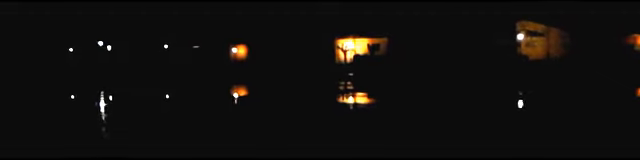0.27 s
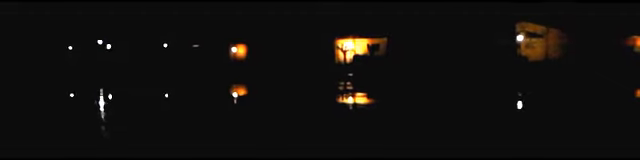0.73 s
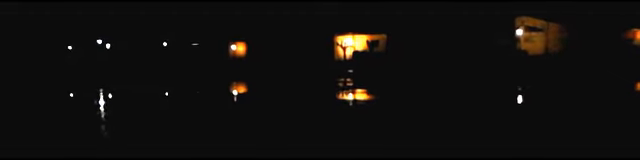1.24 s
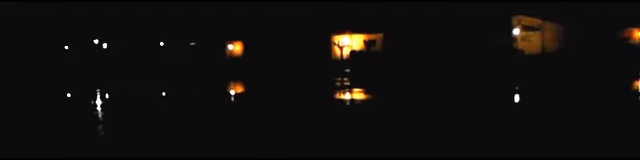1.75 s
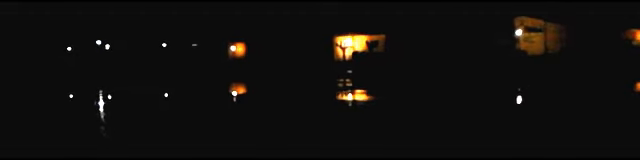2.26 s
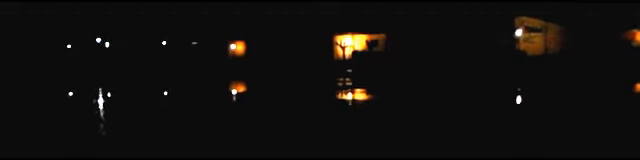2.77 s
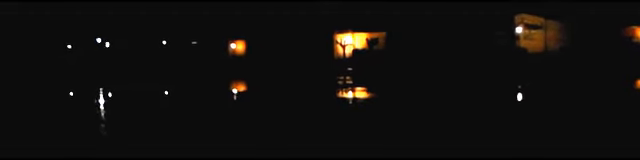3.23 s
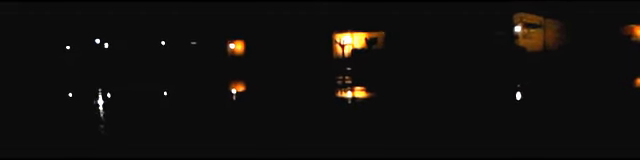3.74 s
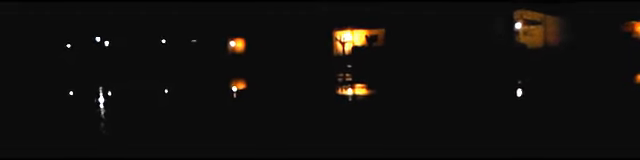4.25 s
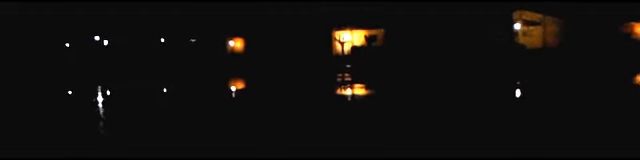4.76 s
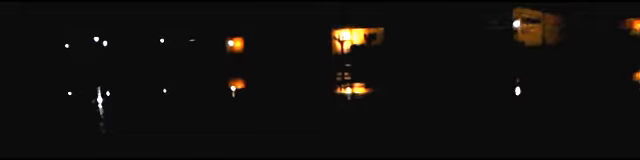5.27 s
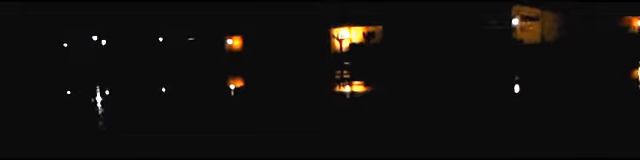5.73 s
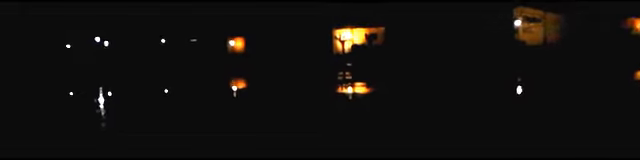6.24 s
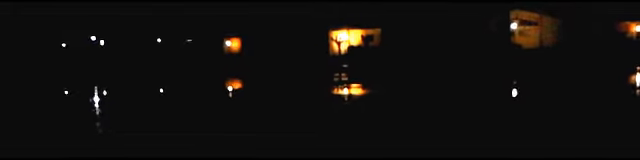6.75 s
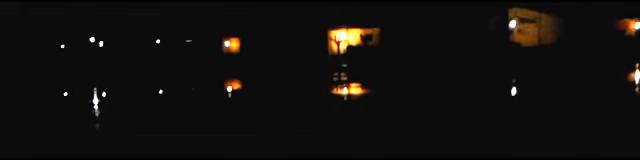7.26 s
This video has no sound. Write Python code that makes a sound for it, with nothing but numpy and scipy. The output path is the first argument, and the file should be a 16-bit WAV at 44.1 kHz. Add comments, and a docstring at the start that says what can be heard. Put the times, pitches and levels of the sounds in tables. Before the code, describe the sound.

Dense chorus of frogs croaking in rapid overlapping rattling trills beside still water at night, with low wind rumble and two soft microphone bumps.

```python
"""Night frog chorus beside still water

Near frogs croak in trains of about 95 pulses a second; each pulse rings the vocal sac (rising as it swells),
the throat, its overtones and some faint treble. Distant frogs merge into a buzzing bed, and thin pulsed
squeaks glide through the treble. Water and banks return short echoes, and hiss swells with the chorus.
Wind rumbles on the microphone, which is bumped twice; faint fluttering tones hoot far off."""
import sys
import numpy as np
from scipy import signal
from scipy.fft import rfft, irfft
from scipy.io import wavfile

SR = 44100
rng = np.random.default_rng(int(sys.argv[2]) if len(sys.argv) > 2 else 0)


def wrap_up_sound(samples):
    """Save the sound to the file named by the first command line argument, as 16-bit audio."""
    columns = np.atleast_2d(samples).T
    # keep every value between -1 and 1, then stretch to whole-number steps
    tamed = np.clip(columns, -1, 1)
    steps = np.round(tamed * 32767).astype(np.int16)
    wavfile.write(sys.argv[1], SR, steps)


def magnitude_from_level(level_db):
    """Linear magnitude for a level in decibels (20 dB per decade)."""
    exponent = np.asarray(level_db, float) / 20
    return 10 ** exponent


N = 330750  # 7.5 s

# distant chorus, levels before each use trims them: (time [s], sac level [dB], throat level [dB])
FAR_CHORUS = [(0.0, -33.5, -35), (0.4, -31, -40.5), (0.62, -33, -38), (0.83, -81, -90), (0.9, -30, -51),
              (0.98, -22, -35.5), (1.21, -26.5, -31), (1.71, -35, -48), (2.02, -27.5, -32),
              (2.36, -38, -37), (2.5, -25, -30.5), (2.8, -25.5, -40.5), (2.94, -52, -52),
              (3.11, -20.5, -37), (3.36, -32, -52), (3.51, -31.5, -28), (3.74, -26.5, -33.5),
              (3.84, -39, -53), (4.05, -38, -32.5), (4.53, -22.5, -36.5), (4.74, -43.5, -51.5),
              (5.26, -26, -27.5), (5.51, -37.5, -47), (6.25, -26.5, -42), (6.52, -38.5, -40.5),
              (7.19, -34, -44.5), (7.5, -21.5, -22)]


def curve(rows, x):
    """Interpolates every column of a table over its first column."""
    points, *columns = np.transpose(rows)
    return [np.interp(x, points, column) for column in columns]


def butter(x, hz, kind, order=2):
    """Butterworth filter."""
    return signal.sosfilt(signal.butter(order, hz, kind, fs=SR, output="sos"), x)


def coloured(points):
    """Noise of rms 1 with the given spectrum, interpolated over log frequency."""
    hz = np.fft.rfftfreq(N, 1 / SR)
    points_hz, points_db = np.array(points).T
    shape_db = np.interp(np.log(hz + 1), np.log(points_hz), points_db, -120, -120)
    noise = irfft(rfft(rng.standard_normal(N)) * magnitude_from_level(shape_db), N)
    return noise / noise.std()


def loudness_db(x, lag_s=0.015):
    """Smoothed power in dB against its mean."""
    share = 1 / (lag_s * SR)
    power = signal.lfilter([share], [1, share - 1], x ** 2)
    return 10 * np.log10(np.abs(power) / power.mean() + 1e-6)


def add(out, s, hz, ring_ms, db):
    """Adds one short ring per pulse, swelling and dying almost evenly, with envelope peak db."""
    t = np.arange(int(ring_ms * SR * .009) + 8) / SR
    start = np.ceil(s * SR).astype(int)
    age = t + (start / SR - s)[:, None]  # exact pulse times, finer than a sample
    k = age * 1900 / ring_ms  # the envelope peaks at k = 5, about 2.6 ring times after the pulse
    envelope = magnitude_from_level(db)[:, None] * (k / 5) ** 5 * np.exp(5 - k)
    rings = envelope * np.sin(2 * np.pi * hz[:, None] * age)
    places = start[:, None] + np.arange(len(t))
    out += np.bincount(places.ravel(), rings.ravel(), 2 * N)[:N]


def swell(u, rise, fall):
    """Level in dB along a call, u from 0 to 1: linear rise and fall in amplitude."""
    return 20 * np.log10(np.clip(np.minimum(u / rise, (1 - u) / fall), 1e-3, 1))


def wind(s):
    """Wind on the microphone: low rumbling noise that comes in lumps several times a second."""
    # slow course of the wind, before the lift below: (time [s], level [dB])
    gusts = [(0.0, -58), (0.5, -53.5), (0.75, -64.5), (1.23, -56.5), (1.73, -61.5), (1.98, -54.5),
             (2.17, -59.5), (4.26, -54.5), (4.72, -61.5), (6.27, -54), (6.5, -62), (7.04, -49.5),
             (7.5, -55)]
    # colour of the rumble: (frequency [Hz], relative density [dB per Hz])
    rumble = [(18, -49.5), (28, -29.5), (45, 3.5), (62, -8.5), (80, 0.5), (100, -16.5), (140, -16.5),
              (220, -23), (300, -24)]
    lift_db = 3.5
    lumps_db = 3.5 * np.interp(s, np.arange(100) / 11, rng.standard_normal(100))
    return magnitude_from_level(curve(gusts, s)[0] + lift_db + lumps_db) * coloured(rumble)


def bumps():
    """Knocks on the microphone housing: a quick snap whose pitch drops into a short low thud."""
    # (time [s], level before a 1.5 dB trim [dB])
    knocks = [(4.254, -20.5), (5.623, -24)]
    out, t = np.zeros(N), np.arange(4000) / SR
    turns = np.cumsum(85 + 700 * np.exp(-t / 0.0027)) / SR
    thud = np.sin(2 * np.pi * turns) * np.exp(-t / 0.021)
    for s, db in knocks:
        i = int(s * SR)
        out[i:i + len(t)] += magnitude_from_level(db - 1.5) * thud
    return out


def hiss(s, frogs):
    """Middle and side hiss, swelling with the chorus below 1450 Hz and wavering quickly."""
    # colour in the middle: (frequency [Hz], relative density [dB per Hz])
    middle_colour = [(76, -54), (130, -23.5), (640, -26.5), (900, -11), (1520, -22), (1960, -6.5),
                     (2700, -18.5), (3700, -38.5), (6500, -36.5), (8750, -34.5), (14300, -42.5)]
    # tilt that turns it into the colour at the sides: (frequency [Hz], change [dB])
    side_tilt = [(3000, -38.5), (5000, -5.5), (8000, -7), (13000, 0)]
    mean_db, share_followed = -42, 0.46  # level at mean chorus loudness; share of its swing in dB
    flicker_db = 1.78 * np.interp(s * 17, np.arange(140), rng.standard_normal(140))
    chorus_db = loudness_db(butter(frogs, 1450, "low", order=4))
    gain = magnitude_from_level(flicker_db + mean_db + share_followed * chorus_db)
    gain = gain + magnitude_from_level(-72.5)  # the microphone's own hiss never stops
    log_tilt = [(np.log(hz), db) for hz, db in side_tilt]
    side_colour = [(hz, db + curve(log_tilt, np.log(hz))[0]) for hz, db in middle_colour]
    return gain * coloured(middle_colour), gain * magnitude_from_level(-24.5) * coloured(side_colour)


def hoots():
    """Faint far hoots: soft gliding tones with a breathy flutter."""
    # level before the flutter: (start [s], length [s], start pitch [Hz], end pitch [Hz], level [dB])
    notes = [(2.99, 0.096, 483, 508, -48), (3.29, 0.12, 500, 473, -47.5), (3.67, 0.13, 485, 509, -48.5),
             (5.029, .13, 466, 557, -46.5), (5.296, 0.1, 584, 580, -52), (5.337, 0.14, 461, 530, -47.5),
             (6.818, 0.18, 265, 190, -46.5)]
    out = np.zeros(N)
    for start, length, hz0, hz1, db in notes:
        u = np.linspace(0, 1, int(length * SR))
        i = int(start * SR)
        flutter = 1 + .6 * np.interp(u * length * 70, np.arange(30), rng.standard_normal(30))
        tone = np.sin(2 * np.pi * np.cumsum(hz0 + (hz1 - hz0) * u) / SR)
        out[i:i + len(u)] += magnitude_from_level(db) * np.sin(np.pi * u) * flutter * tone
    return out


def far_frogs(count=5):
    """Several distant frogs, each with its own pulse rate and sac size, starting croak after croak."""
    out = np.zeros(N)
    for size in np.linspace(-1, 1, count):
        chance = rng.standard_normal((900, 5))
        pulse_rate = rng.uniform(82, 101)  # per second
        s = np.cumsum(1 + .01 * chance[:, 0]) / pulse_rate
        chance, s = chance[s < N / SR], s[s < N / SR]
        croak_s = rng.uniform(.45, .7)
        u = (s / croak_s + rng.random()) % 1  # place within the croak
        sac_db, throat_db = curve(FAR_CHORUS, s)
        db = swell(u, .2, .2) + 2.2 * chance[:, 1]
        wobble = 1 + .01 * chance[:, 2:]
        sac_hz = 2015.4 + 109 * size + 150 * (u - .5)
        add(out, s, sac_hz * wobble[:, 0], 1.25, db + sac_db - 3.0)
        add(out, s, (960 + 170 * size) * wobble[:, 1], 1.6, db + throat_db - 3.5)  # throat
        add(out, s, (3100 + 300 * size) * wobble[:, 1], .7, db + sac_db - 28)  # overtone
        add(out, s, (8700 + 300 * size) * wobble[:, 2], .6, db + throat_db - 22)  # treble
    return out


def faint_squeaks(count=110):
    """Rows for many barely heard squeaks, mostly falling, crowded round 9.1 kHz, louder with the far throats."""
    start, length, spread, fall, soft = rng.random((count, 5)).T
    start = 7.3 * start
    hz = 9100 + 700 * np.tan(2.4 * spread - 1.2)
    db = 0.63 * curve(FAR_CHORUS, start + 0.038)[1] - 30 - 7 * soft
    return list(zip(start, .04 + .07 * length, hz, hz - 1300 * fall + 400, db))


def squeaks():
    """Thin squeaks: narrow tones gliding through the treble, chopped at a slowing pulse rate."""
    # (start [s], length [s], start pitch [Hz], end pitch [Hz], level [dB])
    clear_squeaks = [(0.0, .07, 8800, 8450, -41), (.43, 0.19, 8500, 7930, -54),
                     (.553, 0.2, 10200, 8800, -55), (.903, 0.065, 8770, 8700, -38),
                     (0.998, 0.16, 9760, 9200, -46), (1.081, .19, 11400, 10430, -39.5),
                     (1.145, .19, 7400, 6950, -41.5), (1.331, .21, 8450, 7340, -48.5),
                     (1.523, .11, 9360, 8600, -50), (1.798, .11, 8900, 8200, -43),
                     (2.043, 0.09, 8200, 8800, -41), (1.97, 0.069, 5000, 6100, -50),
                     (2.129, .11, 9330, 8540, -38), (2.622, .19, 11400, 10300, -38.5),
                     (2.906, .1, 8900, 8300, -47), (3.038, 0.13, 8770, 8500, -47.5),
                     (3.423, 0.19, 5600, 6240, -50.5), (3.47, 0.061, 9640, 9000, -42),
                     (3.571, .22, 7360, 6700, -37), (3.61, .12, 9760, 8450, -34.5),
                     (3.74, 0.098, 8640, 7760, -41), (4.02, 0.32, 8640, 8920, -43.5),
                     (4.203, .06, 10000, 9500, -49), (4.522, .047, 8900, 8500, -43.5),
                     (4.6, 0.27, 8750, 8560, -52), (4.678, .1, 7700, 7200, -53),
                     (4.704, 0.19, 11440, 10200, -44), (4.989, .13, 9100, 8850, -45),
                     (5.08, .13, 5270, 6000, -53), (5.11, .1, 7900, 8700, -46),
                     (5.7, 0.062, 9330, 7960, -40), (5.875, .15, 11600, 11000, -50),
                     (5.897, .1, 9340, 8400, -43), (5.95, 0.13, 6780, 7200, -44.5),
                     (6.122, .19, 11300, 10330, -39.5), (6.19, .1, 8400, 7600, -42),
                     (6.375, 0.14, 8820, 8400, -43.5), (7.297, 0.11, 9000, 9500, -47.5)]
    out = np.zeros(N)
    for start, length, hz0, hz1, db in clear_squeaks + faint_squeaks():
        chance = rng.standard_normal((40, 3))
        u = np.cumsum(1 + 0.0053 * np.arange(40) + 0.028 * chance[:, 0]) / 94 / length - .05
        chance, u = chance[u < 1], u[u < 1]
        hz = (hz0 + (hz1 - hz0) * u) * (1 + 0.0048 * chance[:, 1])
        pulse_db = db + swell(u + 0.055, 0.25, 0.18) + 0.62 * chance[:, 2]
        add(out, start + u * length, hz, 1.2, pulse_db)
    return out


def croaks():
    """Near frogs: pulses slow towards the end while the swelling sac climbs in pitch, fast at first."""
    # (voice, start [s], length [s], sac pitch at start [Hz], sac level [dB], throat level [dB])
    calls = [("high", -.2, .33, 1980, -25, -26), ("middle", .024, .33, 1743, -26, -36.5),
             ("low", .101, .64, 1793, -30.5, -33.5), ("middle", .246, .36, 1883, -22, -44),
             ("bright", .398, .34, 2000, -39, -34.5), ("low", .863, .57, 1742, -20, -29.5),
             ("bright", .929, .43, 2007, -26.5, -25), ("middle", 1.201, .52, 1844, -22.5, -33.5),
             ("high", 1.3, .33, 2346, -30, -35.5), ("middle", 1.554, .37, 1870, -25, -40.5),
             ("low", 1.757, .48, 1940, -17.5, -28), ("high", 1.918, .36, 2305, -22, -21),
             ("low", 2.181, .49, 1660, -25.5, -32), ("high", 2.352, .44, 2290, -26, -25.5),
             ("middle", 2.501, .41, 1926, -21.5, -29.5), ("middle", 2.874, 0.48, 1900, -34.5, -42),
             ("middle", 3.021, .44, 2024, -16, -36.5), ("bright", 3.37, .36, 1640, -21, -32),
             ("bright", 3.444, .38, 1950, -25.5, -23.5), ("middle", 3.696, .3, 2060, -25, -31.5),
             ("low", 3.878, .53, 1735, -30.5, -27.5), ("high", 4.202, 0.43, 2390, -35.5, -35.5),
             ("low", 4.248, .44, 1630, -30.5, -37.5), ("bright", 4.519, .44, 2020, -30.5, -40),
             ("middle", 4.82, .41, 1770, -28.5, -36.5), ("bright", 5.046, .35, 1964, -25.5, -22.5),
             ("low", 5.148, .45, 1699, -22, -33.5), ("low", 5.621, 0.53, 1764, -22.5, -31.5),
             ("high", 5.662, .37, 2390, -38.5, -33), ("middle", 5.948, .51, 2030, -23, -31),
             ("low", 6.099, 0.34, 1570, -28, -42), ("middle", 6.38, 0.4, 1890, -37, -29.5),
             ("high", 6.604, .31, 2310, -28, -36.5), ("middle", 6.697, 0.33, 1675, -33, -49),
             ("high", 6.851, 0.5, 2293, -30.5, -35), ("middle", 7.022, .39, 1856, -24.5, -38.5),
             ("bright", 7.294, 0.537, 1868, -17.5, -19.5)]
    # voice: (first pulse rate [per s], sac pitch rise before its sag [Hz],
    #         overtone offset [dB], treble level against the throat [dB])
    voices = {"bright": (95, 522, -4.5, -11.5), "low": (99, 315, -11, -16), "middle": (96, 146, -11, -14),
              "high": (95, 128, -7.5, -17)}
    # throat modes before the swelling: (frequency [Hz], ring time [ms], relative level [dB])
    throat = [(893, 1.424, -2), (1144, 0.64, -10), (1414, 1.17, -12)]
    # overtones before the sac swells: (frequency [Hz], ring time [ms], relative level [dB])
    overtones = [(2656, 0.66, -12), (3010, 0.62, -6.5), (3437, 0.54, -17.5)]
    # treble modes before each croak shifts them: (frequency [Hz], ring time [ms], relative level [dB])
    treble = [(8750, .42, 0), (6000, .1, -13), (10800, .1, -15)]
    rate_spread = .05  # relative, from croak to croak
    sag = 0.17  # share of the rise lost as the croak ends
    overtone_with_sac = 0.23  # the overtones' level lies between throat (0) and sac (1)
    out = np.zeros(N)
    for voice, start, length, hz0, sac_db, throat_db in calls:
        rate, rise_hz, over_db, treble_db = voices[voice]
        chance = rng.standard_normal((80, 6))
        u = np.arange(80) / (rate * (1 + rate_spread * chance[-1, 0])) / length
        u = u + .05 * u ** 3  # the pulses slow down
        heard = (u < 1) & (start + u * length > .001)
        chance, u = chance[heard], u[heard]
        s = start + u * length + .00006 * chance[:, 0]
        db = swell(u + 0.064, 0.19, 0.12) + 2.23 * chance[:, 1] - 14 * (u - .5) ** 2
        swollen = u ** 0.66 - sag * u ** 5
        wobble = 1 + .007 * chance[:, 2:]
        add(out, s, (hz0 + rise_hz * swollen) * wobble[:, 0], 1.3, db + sac_db)
        for hz, ring_ms, mode_db in throat:
            throat_hz = hz * (1 + 0.062 * swollen) * wobble[:, 1]
            add(out, s, throat_hz, ring_ms, db + throat_db + mode_db)
        overtone_db = throat_db + overtone_with_sac * (sac_db - throat_db) + over_db
        for hz, ring_ms, mode_db in overtones:
            overtone_hz = hz * (1 + 0.15 * swollen) * wobble[:, 2]
            add(out, s, overtone_hz, ring_ms, db + overtone_db + mode_db)
        for hz, ring_ms, mode_db in treble:
            treble_hz = hz * (1 + 0.018 * chance[0, 0] - 0.012 * (u - .5)) * wobble[:, 3] ** 2
            add(out, s, treble_hz, ring_ms, db + throat_db + treble_db + mode_db)
    return out


def echoes(frogs):
    """Water and banks return delayed, weaker copies of the frogs."""
    # (delay [s], level [dB])
    reflections = [(.0023, -12), (.0173, -17), (.041, -19), (.067, -22)]
    return sum(magnitude_from_level(db) * np.roll(frogs, int(lag * SR)) for lag, db in reflections)


def scene():
    """Frogs with echoes, hiss, wind, hoots and bumps; the two channels differ mainly in the treble."""
    s = np.arange(N) / SR
    frogs = croaks() + far_frogs() + squeaks()
    echo = echoes(frogs)
    frogs = butter(frogs + echo, 863, "high", order=4)
    mid_hiss, side_hiss = hiss(s, frogs)
    mid = frogs + mid_hiss + wind(s) + hoots() + bumps()
    side = magnitude_from_level(-23) * butter(echo, 3330, "high", order=4) + side_hiss
    return np.array([mid + side, mid - side]) - .002  # slight constant offset


def roll_off(x):
    """The treble ends steeply here."""
    return signal.sosfilt(signal.butter(12, 15430, fs=SR, output="sos"), x)


def record(dry):
    """A steep low-pass cuts the top above 14280 Hz."""
    low_pass = signal.ellip(12, .5, 70, 14280, fs=SR, output="sos")
    mix = signal.sosfilt(low_pass, dry)
    return roll_off(mix)


dry = scene()
out = record(dry)
wrap_up_sound(out)
```